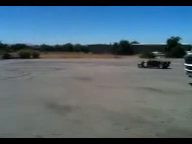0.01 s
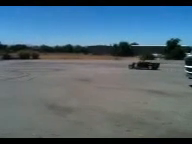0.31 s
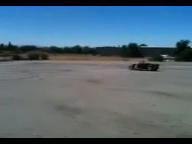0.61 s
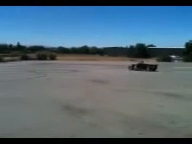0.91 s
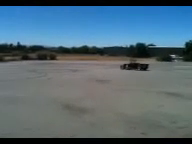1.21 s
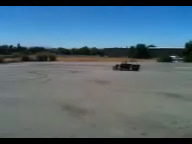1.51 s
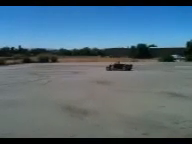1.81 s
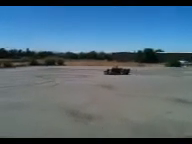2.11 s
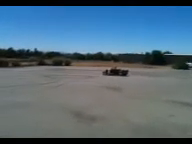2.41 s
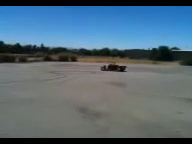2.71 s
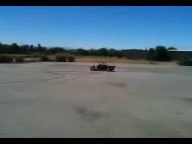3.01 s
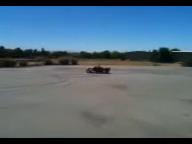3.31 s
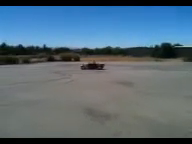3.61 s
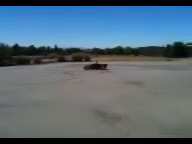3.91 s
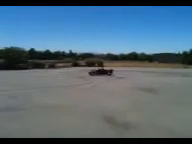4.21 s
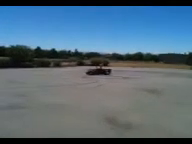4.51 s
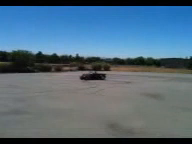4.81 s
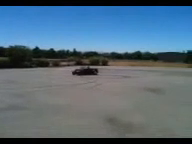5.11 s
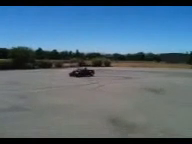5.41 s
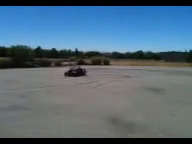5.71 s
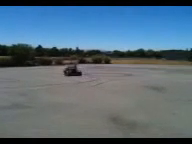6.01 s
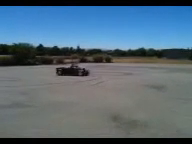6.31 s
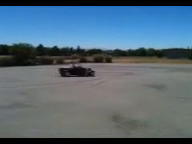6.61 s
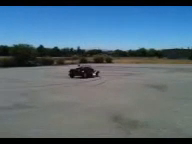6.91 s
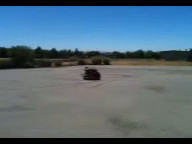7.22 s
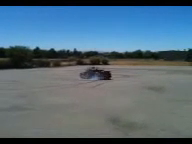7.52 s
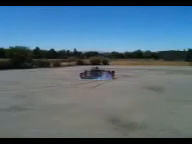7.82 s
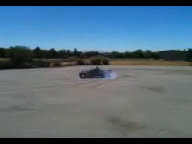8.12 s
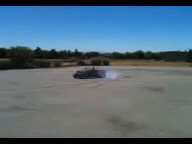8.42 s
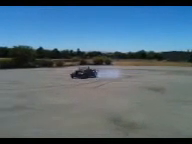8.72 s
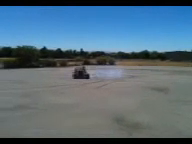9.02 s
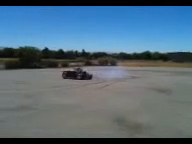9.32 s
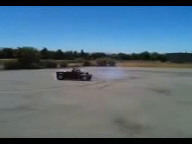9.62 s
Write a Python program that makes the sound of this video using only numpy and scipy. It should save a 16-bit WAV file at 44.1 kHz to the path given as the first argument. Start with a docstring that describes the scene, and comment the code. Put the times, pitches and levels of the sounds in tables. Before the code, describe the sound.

On an open paved lot, a pickup truck coasts with a throbbing exhaust burble and faint chirps. The driveline clacks once, the throttle is blipped twice, and the engine flares to high revs. Tyres judder and squeal as the truck spins, while the engine sags briefly and settles into a steady roar. The sound is dull, through a small microphone that distorts on the peaks.

```python
"""A V8 pickup idles with a lumpy burble on an open paved lot, its engine bay squeaking faintly. At 4.5 s the
clutch clacks and the engine revs up; from about 6 s the truck spins donuts. Exhaust tones and puffs of gas roar
through the tailpipe while the tyres scrub and squeal. A small microphone dulls the treble throughout and
overloads when the truck is loudest."""
import sys
import numpy as np
from scipy import signal
from scipy.fft import rfft, irfft
from scipy.io import wavfile
from scipy.ndimage import uniform_filter1d

SR = 44100
rng = np.random.default_rng(int(sys.argv[2]) if len(sys.argv) > 2 else 0)


def wav_out(sig):
    """Save sig, one row per channel (or a flat mono array), as 16-bit PCM at SR to the path in sys.argv[1]."""
    wavfile.write(sys.argv[1], SR, np.round(np.clip(np.atleast_2d(sig).T, -1, 1) * 32767).astype(np.int16))


N = 436590
T = np.arange(N) / SR


def amp(db):
    """Turns decibels into a gain."""
    return 10 ** (np.asarray(db) / 20)


def unit(x):
    """Scales a sound to an average (rms) level of 1."""
    return x / np.sqrt(np.mean(x ** 2) + 1e-20)


def steady(x):
    """Evens out slow changes of level and keeps the throb."""
    power = uniform_filter1d(uniform_filter1d(x ** 2, size=5000), size=3500)
    return x / np.sqrt(abs(power) + 1e-12)


def curve(points):
    """Joins (time, value) points with straight lines."""
    return np.interp(T, *np.transpose(points))


def gate(start, end, rise_s, fall_s):
    """Rises, holds and dies away, 0-1."""
    return np.clip((T - start) / rise_s, 0, 1) * np.exp(-np.maximum(T - end, 0) / fall_s)


def drift(rate_hz):
    """A smooth random wobble of size about 1, no faster than rate_hz."""
    knots = signal.resample_poly(rng.standard_normal(2000), 8, 1)
    return np.interp(T * rate_hz * 16, np.arange(len(knots)), knots)


def response(spectrum, hz):
    """Looks up a spectrum's gain at a frequency."""
    freqs, db = np.transpose(spectrum)
    return amp(np.interp(np.log(hz + 1), np.log(freqs + 1), db))


def colour(x, spectrum):
    """Filters a sound by a spectrum and scales it to level 1."""
    return unit(irfft(rfft(x) * response(spectrum, np.fft.rfftfreq(N, 1 / SR)), N))


def split_bands(x):
    """Splits a sound, low to high, into boom, growl, bark, scrub and screech."""
    # borders between the bands: (frequency [Hz])
    edges = [290, 560, 950, 2400]
    hz, spectrum = np.fft.rfftfreq(N, 1 / SR), rfft(x)
    below = [1 / (1 + (hz / edge) ** 16) for edge in edges]
    bands = np.diff([np.zeros_like(hz), *below, np.ones_like(hz)], axis=0)
    return [irfft(spectrum * band, N) for band in bands]


def engine_squeak(turns, pitch_hz=2930, gain_db=-60.5):
    """The engine bay whistles faintly once every two crank turns while the truck coasts."""
    pulse = np.exp(-((turns / 2 % 1 - .5) / .16) ** 2) * amp(2 * drift(12))
    hz = pitch_hz * (1 + .028 * drift(90))
    tone = np.sin(2 * np.pi * np.cumsum(hz) / SR)
    return amp(gain_db) * gate(2.15, 3.6, rise_s=.4, fall_s=.4) * pulse * tone


def clutch_clack(start_s=4.515, rise_s=.0016, decay_s=.0059, gain_db=-42):
    """Metal clacks briefly as the clutch is pressed down."""
    # ringing of the metal: (pitch [Hz], width [Hz], level [dB])
    modes = [(1940, 190, 8), (2500, 460, -20), (3400, 700, -30)]
    age, noise = np.maximum(T - start_s, 0), rng.standard_normal(N)
    ring = sum(amp(db) * unit(signal.lfilter(*signal.iirpeak(hz, hz / width, SR), noise))
               for hz, width, db in modes)
    return amp(gain_db) * unit(ring) * age / rise_s * np.exp(-age / decay_s)


def tyre_chirps(slips_per_s=7):
    """Tread blocks let go in a twitter of tiny squeaks; the low ones are louder."""
    out, window = np.zeros(N), signal.windows.hann(800)
    for hz in np.geomspace(1800, 3100, num=40):
        slips = (rng.random(N) < slips_per_s / SR) * amp(3 * rng.standard_normal(N))
        squeak = window * np.sin(2 * np.pi * hz * np.arange(len(window)) / SR) / hz ** 2
        out += signal.oaconvolve(slips, squeak, "same")
    return unit(out)


def tyre_squeals():
    """The tread sticks and slips, making short, unsteady tones."""
    # squeals: (start [s], end [s], first pitch [Hz], last pitch [Hz], level [dB])
    squeals = [(0, .3, 1810, 1810, -63), (.52, .82, 715, 795, -47), (.74, 1.08, 795, 795, -48),
               (1.02, 1.26, 1220, 1210, -54), (1.24, 1.7, 1205, 1200, -57), (1.93, 2.1, 655, 670, -49),
               (3.83, 3.96, 1120, 1160, -56), (6.19, 6.29, 1420, 1520, -25.5),
               (9.19, 9.35, 1440, 1480, -26), (9.43, 9.55, 1470, 1510, -26)]
    out = np.zeros(N)
    bend, flutter = 1 + .022 * drift(90), amp(3.5 * drift(25))
    for start, end, first_hz, last_hz, db in squeals:
        on = (T >= start) & (T < end)
        hz = np.linspace(first_hz, last_hz, on.sum()) * bend[on]
        tone = np.sin(2 * np.pi * np.cumsum(hz) / SR)
        out[on] += amp(db) * unit(tone * flutter[on] * signal.windows.tukey(len(hz), .3))
    return out


def tyres(turns, load, judder_db=3, chatter_db=2, chirp_db=-7.5):
    """Rolling hiss and chirps turn into juddering scrub, mixed with the rasp of each firing."""
    # spinning tyres: (frequency [Hz], level [dB])
    scrub_spectrum = [(530, -22.5), (900, 5), (1080, -7.5), (1220, -1.5), (1470, -2), (1810, -12),
                      (2160, -8), (2520, -17), (3330, -18), (3830, -21.5), (4400, -36.5), (5720, -66.5),
                      (9680, -120)]
    # rolling tyres and engine-bay hiss: (frequency [Hz], level [dB])
    roll_spectrum = [(530, -31.5), (900, 6.5), (1080, -8.5), (1170, -6), (1240, -11), (1280, -5.5),
                     (1670, -10), (2150, -8.5), (3580, -16.5), (3980, -24.5), (4400, -41), (5720, -84.5),
                     (9680, -120)]
    slip = amp(judder_db * drift(35)) * rng.standard_normal(N)
    scrub = colour(unit(slip) + unit(gas_puffs(turns)), scrub_spectrum)
    hiss = colour(amp(chatter_db * drift(30)) * rng.standard_normal(N), roll_spectrum)
    coasting_fade = np.interp(T, [2.5, 4], [1, .3])
    roll = hiss + amp(chirp_db) * tyre_chirps() * coasting_fade
    return (1 - load) * roll + load * scrub


def pedal(open_s=.095, close_s=.15):
    """The throttle, 0-1, opens quickly on each press and eases shut afterwards."""
    # pedal presses: (down [s], lifted [s], depth [0-1])
    presses = [(4.918, 5.109, 0.96), (5.287, 5.602, .97), (5.587, 6.025, 0.89), (6.12, 7.794, 0.84),
               (7.748, 9.903, 0.95)]
    return np.max([depth * gate(down, up, open_s, close_s) for down, up, depth in presses], axis=0)


def pipe_ringing(crank_hz, best_hz=43.5, width_hz=6.6):
    """How strongly the firings make the tailpipe ring at this crank speed, 0-1."""
    return np.exp(-((crank_hz - best_hz) / width_hz) ** 2)


def gas_puffs(turns, swell=.25, fade=.96, scatter_db=1.5):
    """Each firing, four a turn, puffs out rushing gas; the puffs swell once every two turns."""
    firing = np.floor(4 * turns).astype(int)
    size = amp(scatter_db * rng.standard_normal(4096))[firing]
    age = 4 * turns - firing
    return size * np.exp(swell * np.cos(np.pi * turns) - fade * age) * rng.standard_normal(N)


def engine_tone(turns, multiple, waver_db, waver_hz):
    """A tone at a multiple of crank speed, wavering as the fuel burns unevenly."""
    return amp(waver_db * drift(waver_hz)) * np.cos(2 * np.pi * (multiple * turns + rng.random()))


def roughness(crank_hz, throttle, load, blend, strain_hz=68.4):
    """Gain of the puffs against the tones: an open throttle below strain_hz makes them splutter."""
    splutter_db = 6 * throttle * np.clip((strain_hz - crank_hz) / 11, 0, 1)
    idle_db = (1 - load) * (2.5 + 4.5 * np.minimum(blend, 0))  # the off-beat boom is cleaner
    clean_db = 3.5 * pipe_ringing(crank_hz) + 5.5 * np.maximum(np.log2(crank_hz / strain_hz), 0)
    return amp(-5 + idle_db + splutter_db - clean_db)


def exhaust(crank_hz, turns, throttle, load, blend):
    """Tones and puffs leave the tailpipe as a lumpy burble at light load, a roar at heavy load."""
    # uneven firing at light load: (multiple of crank speed, level [dB])
    burble_tones = [(4, -1), (5, -0.5), (5.5, 3.5), (6, -12.5), (6.5, 4.5), (7, 0), (7.5, -23.5), (8, -2),
                    (9, -9.5), (9.5, -12.5), (10, -3.5), (10.5, 1), (11, -3.5), (11.5, -2), (12, -4.5),
                    (12.5, -3.5), (13, 6), (18.5, -4.5), (25.5, -6)]
    # tones that stand out or sink at heavy load: (multiple of crank speed, level [dB])
    roar_accents = [(1.5, -11.5), (2, -5.5), (2.5, 0.5), (3, -1.5), (3.5, -1), (4, 6), (4.5, 0.5), (5, -3),
                    (6.5, -3), (7, -0.5), (7.5, 2), (8, -6.5), (8.5, 7), (9, 4.5), (9.5, -2), (10, 0.5),
                    (10.5, 3.5), (12, -1.5)]
    # tailpipe at light load: (frequency [Hz], level [dB])
    soft_pipe = [(15, -55.5), (50, -21.5), (100, -16), (180, 6.5), (235, -7.5), (280, -8.5), (345, -10),
                 (450, -23.5), (540, -15), (730, -9.5), (880, -23.5), (2000, -57.5)]
    # tailpipe at heavy load, for the tones: (frequency [Hz], level [dB])
    loud_pipe = [(80, -25.5), (138, -4), (175, 3), (245, 4.5), (290, -8.5), (340, -8), (420, -7.5),
                 (520, -6.5), (580, -12), (630, -4.5), (715, -2), (790, -10.5), (1050, -16.5), (1420, -14),
                 (2000, -24)]
    # tailpipe at heavy load, for the puffs: (frequency [Hz], level [dB])
    loud_puffs = [(15, -39.5), (40, -19.5), (100, -11), (160, -7.5), (230, -2.5), (400, -11), (720, -0.5),
                  (950, -7), (1500, -10.5), (4000, -37)]
    firing_db = -2 + 10.5 * blend + 11.5 * pipe_ringing(crank_hz)
    offbeat = amp(1.5 - 12.5 * blend)
    boost = {2.5: offbeat, 7: offbeat, 4: amp(firing_db), 8: amp(.7 * firing_db)}

    def tones(rows, pipe, waver_db, waver_hz):
        """Adds up engine tones as they sound through the pipe."""
        return steady(sum(amp(db) * boost.get(k, 1) * response(pipe, k * crank_hz)
                          * engine_tone(turns, k, waver_db, waver_hz) for k, db in rows))

    burble = tones(burble_tones, soft_pipe, waver_db=3.5, waver_hz=4)
    multiples = np.arange(1.5, 24, .5)
    accents_db = np.interp(multiples, *np.transpose(roar_accents))
    roar = tones(zip(multiples, accents_db), loud_pipe, waver_db=4.5, waver_hz=5)
    gas, puff_gain = gas_puffs(turns), roughness(crank_hz, throttle, load, blend)
    light = burble + puff_gain * colour(gas, soft_pipe)
    heavy = roar + puff_gain * colour(gas, loud_puffs)
    return (1 - load) * light + load * heavy


def boom_dips():
    """A gain that makes the low boom dip briefly."""
    # dips: (middle [s], length [s], level change [dB])
    dips = [(2.42, .16, -4), (2.973, 0.098, -3), (5.247, 0.11, -1.5), (7.947, 0.23, -9)]
    return amp(sum(db * np.exp(-(2 * (T - middle) / length) ** 2) for middle, length, db in dips))


def band_levels(crank_hz, throttle, blend, idle_hz=28):
    """Each band's level in dB follows the engine, the truck's path and the tyres' grip."""
    # the tyres bite and scrub harder: (start [s], end [s], boost [dB])
    bites = [(6.05, 6.42, 3), (6.64, 7.025, 7.5), (7.037, 7.31, 5), (7.585, 7.8, 4.5), (7.847, 8.03, 8),
             (8.08, 8.22, 5), (9.165, 9.9, 2)]
    # effect of the truck's distance and heading: (time [s], level [dB])
    path = [(0, -0.4), (.6, 2), (1.5, 1), (3, -1), (3.7, 0), (4.45, -1.35), (6.1, -2), (6.25, 2.5),
            (6.53, 0), (6.85, 4.5), (7.6, 6), (8.6, -1.16), (9.9, 1)]
    # one row per band, low to high: (idle level [dB], per doubling of speed [dB], full throttle [dB],
    # pipe ringing [dB], per unit of blend [dB], share of path, share of bites)
    weights = [(-34.5, 4.5, 10.5, 13, -4.5, 1.01, .1), (-44.5, 4, 15, 9, 4, 1.48, .05),
               (-53, 10.5, 19.5, 6, 0, 0.94, 0.059), (-56, 8.5, 20, 0.5, 0.5, 0.22, 0.73),
               (-64, 8.5, 12, 0, 0.5, .5, 0.88)]
    bite_db = np.max([db * gate(start, end, rise_s=.038, fall_s=.057) for start, end, db in bites], 0)
    doublings = np.log2(crank_hz / idle_hz)
    causes = [np.ones(N), doublings, throttle, pipe_ringing(crank_hz), blend, curve(path), bite_db]
    return np.array(weights) @ np.array(causes)


def scene(burble_hz=34, roar_hz=58, rasp_db=-6):
    """Engine speed and pedal drive the exhaust and tyres as the truck swings round."""
    # idle, two blips, a flare as the tyres let go, a sag, a steady spin: (time [s], speed [turns/s])
    crank_speed = [(0, 28), (1.2, 28.3), (1.55, 30), (2.4, 27.3), (3.5, 27.4), (3.9, 29), (4.5, 28.9),
                   (4.7, 37.1), (4.93, 43.7), (5.08, 56.3), (5.33, 53), (5.6, 68.2), (5.77, 65.5),
                   (6.18, 76), (6.42, 101.5), (6.53, 101.5), (6.78, 89), (6.98, 84), (7.25, 84),
                   (7.68, 77.5), (7.92, 62.7), (8.18, 70.4), (8.4, 67.8), (9.45, 69.4), (9.9, 73)]
    # mix of the two cylinder banks as the truck turns:
    # (time [s], blend [-1 one bank's off-beat boom, +1 both banks' even growl])
    bank_blend = [(0, 0.69), (1.5, -0.021), (3.05, 0.045), (3.7, -1.23), (4.45, -0.43), (4.85, 0.36),
                  (5.75, 0.18), (6, 0.39), (6.25, -0.042), (6.55, -0.93), (6.95, 0.25), (7.3, 0.92),
                  (7.53, 0.03), (7.95, -0.12), (8.2, -0.18), (9.25, 0.45), (9.55, 0.3), (9.9, 0.41)]
    crank_hz = curve(crank_speed) * (1 + .003 * drift(14) + .002 * drift(70))
    turns = np.cumsum(crank_hz) / SR
    throttle, blend = pedal(), curve(bank_blend)
    load = np.clip((crank_hz - burble_hz) / (roar_hz - burble_hz), 0, 1)  # 0 burble, 1 roar
    boom, growl, bark, rasp, _ = split_bands(exhaust(crank_hz, turns, throttle, load, blend))
    *_, scrub, screech = split_bands(tyres(turns, load))
    scrub = steady(scrub) + amp(rasp_db) * load * steady(rasp)
    bands = [boom_dips() * steady(boom), steady(growl), steady(bark), steady(scrub), steady(screech)]
    truck = sum(amp(db) * band for db, band in zip(band_levels(crank_hz, throttle, blend), bands))
    return (truck + tyre_squeals() + clutch_clack() + engine_squeak(turns))[None]


def lowpass(x, hz):
    """Steeply cuts the treble above hz."""
    return signal.oaconvolve(x, signal.firwin(401, hz, window=("kaiser", 9), fs=SR)[None], "same")


def record(dry):
    """A small microphone loses the treble, and its highest peaks clip and crackle."""
    clipped = np.clip(lowpass(dry, hz=4300), -.7, .7)
    return lowpass(clipped, hz=15900)


dry = scene()
out = record(dry)
wav_out(out)
```